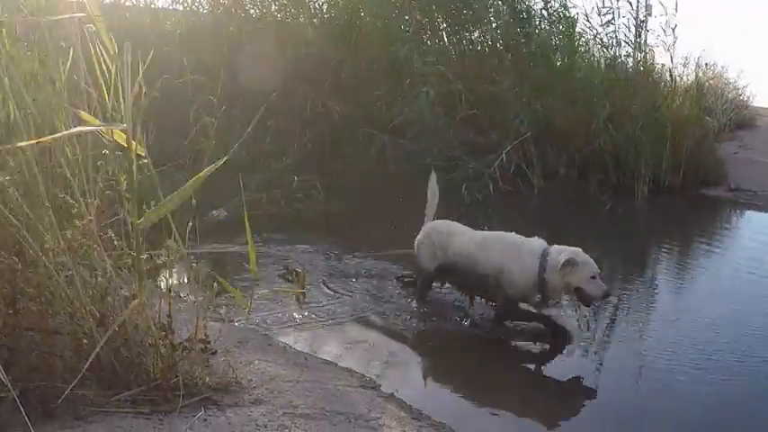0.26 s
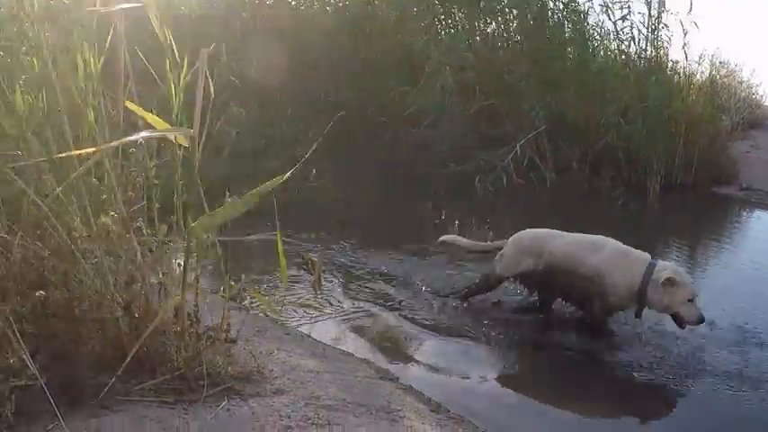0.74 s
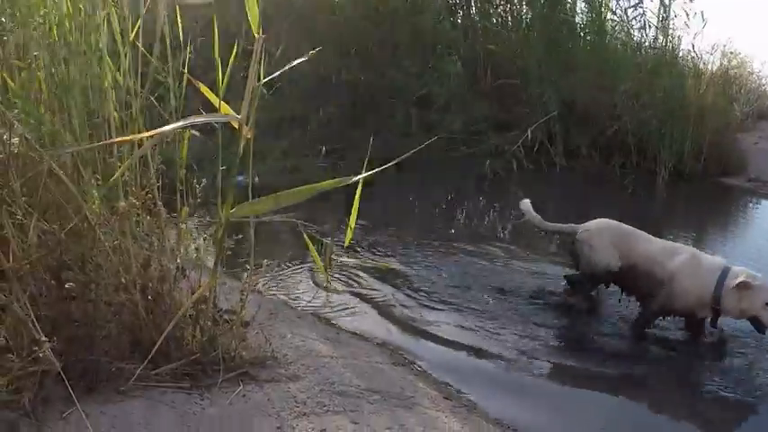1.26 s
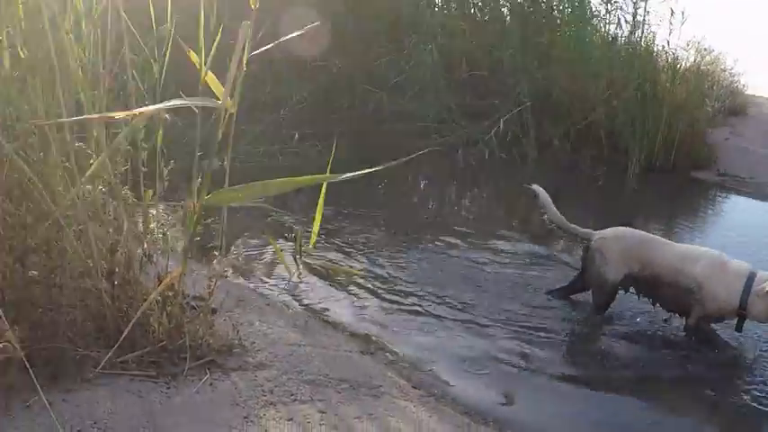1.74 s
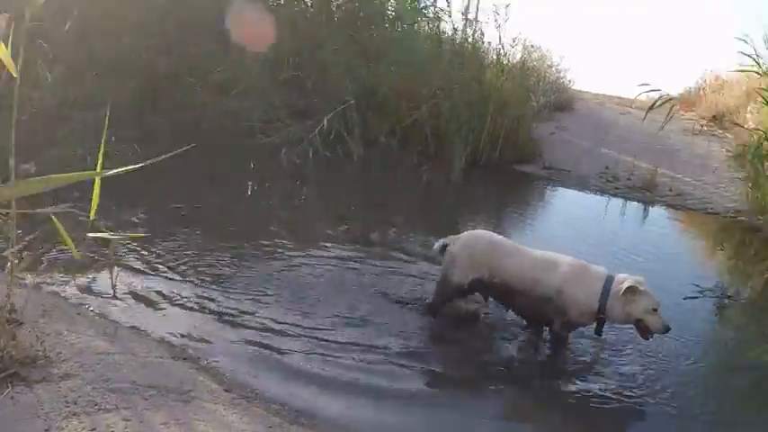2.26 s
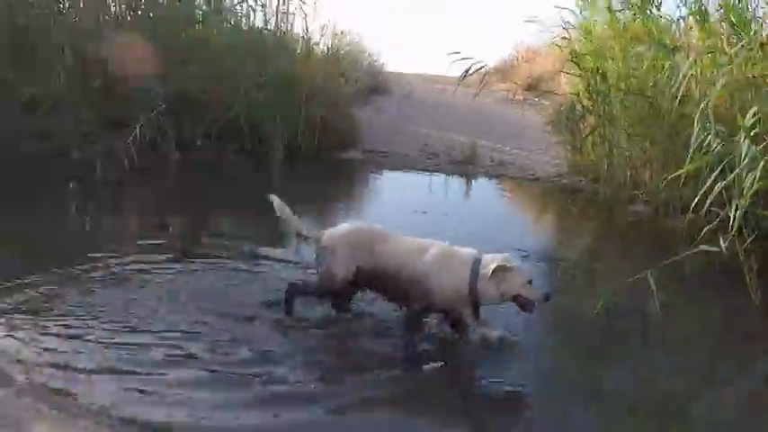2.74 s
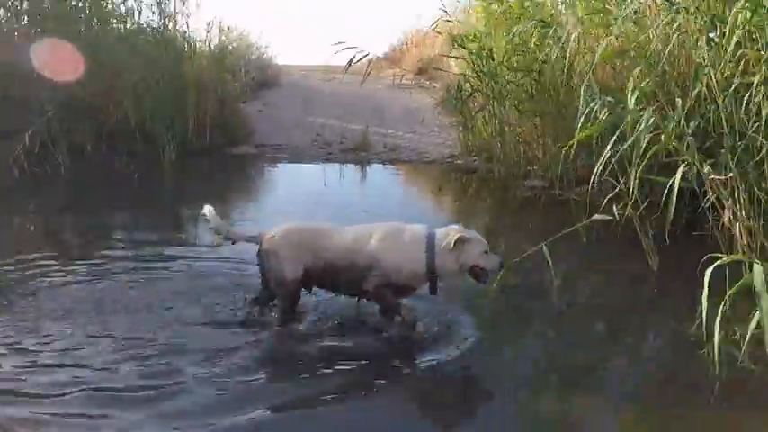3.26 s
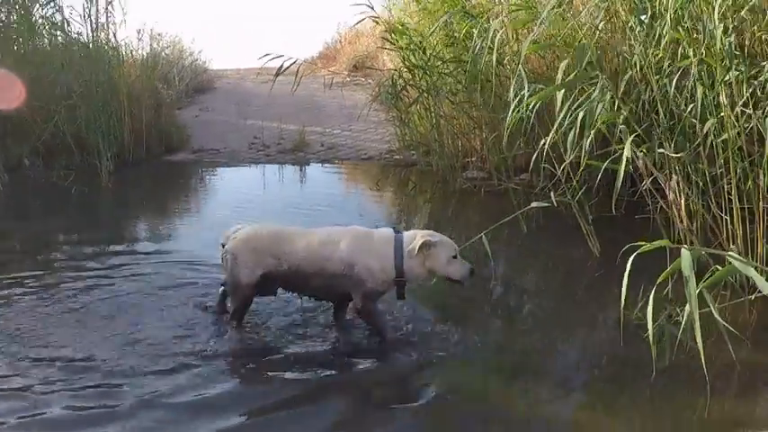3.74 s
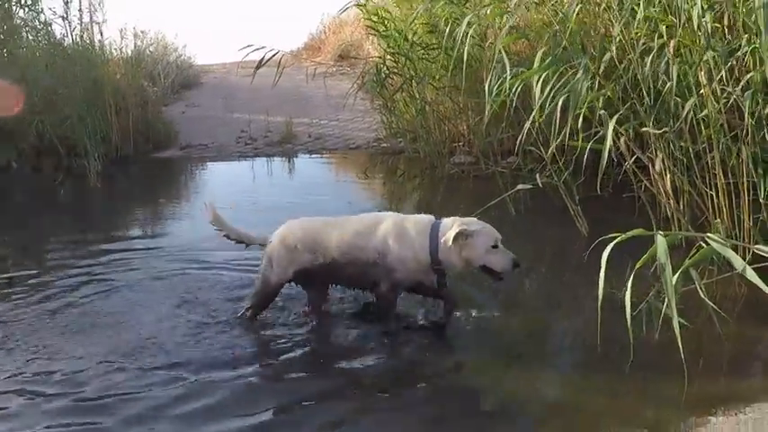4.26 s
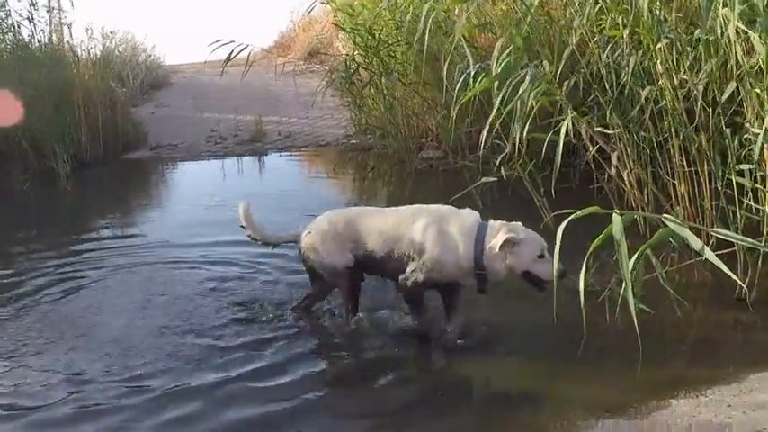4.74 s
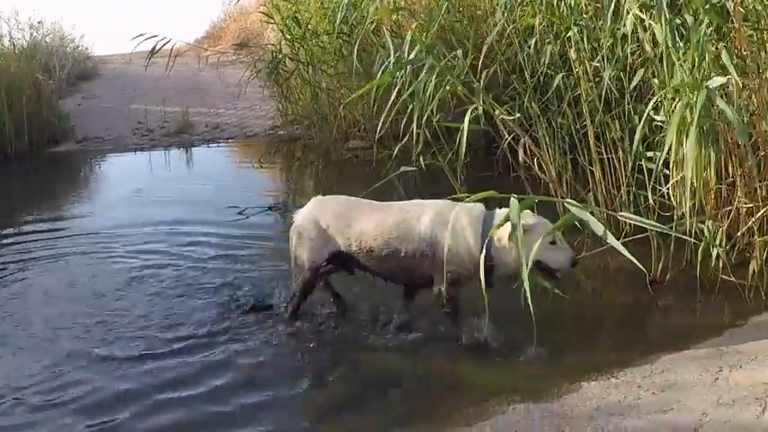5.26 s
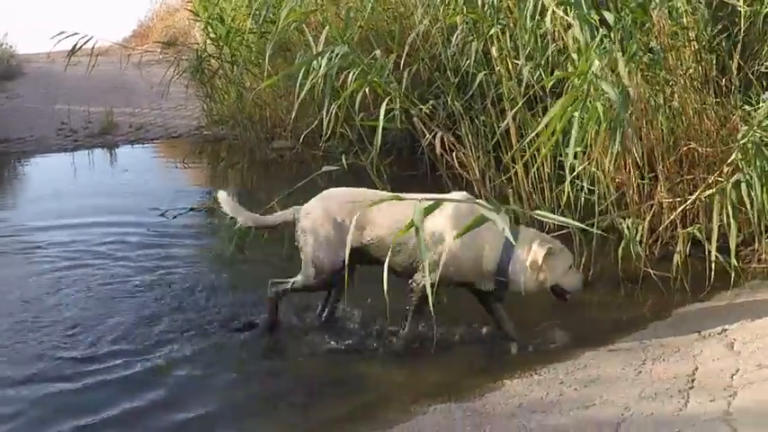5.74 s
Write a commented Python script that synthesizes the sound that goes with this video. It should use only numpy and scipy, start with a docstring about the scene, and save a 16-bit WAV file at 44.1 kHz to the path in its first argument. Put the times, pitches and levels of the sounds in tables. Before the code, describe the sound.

A dog walks through a shallow reed-fringed pool: hollow plops, wet slaps, small gurgles, fizzing spray and falling drops in quick uneven steps. Wind batters the handheld camera microphone at first, with thudding handling knocks around two seconds; then the rumble drops away and the splashing stands clear over a soft hiss of reeds.

```python
"""A dog wades through a shallow pool: paws plop and slap, legs churn up bubbles and spray, drops fall back.
Water is ringing air pockets (decaying, gliding sines), swarms of small bubbles and short noise bursts.
The hand-held camera knocks and jolts (damped sines); wind, mostly early, buffets its two microphone ports
(lumpy filtered noise). Reedy banks return a faint echo, and the reeds hiss all around (stereo noise)."""
import sys
import numpy as np
from scipy import signal
from scipy.fft import rfft, irfft, next_fast_len
from scipy.io import wavfile
from scipy.ndimage import map_coordinates

SR = 44100
rng = np.random.default_rng(int(sys.argv[2]) if len(sys.argv) > 2 else 0)


def transcribe(signal):
    """Save signal, clipped to [-1, 1], as a 16-bit WAV file at the path in sys.argv[1]."""
    frames = np.atleast_2d(signal).T
    limited = np.clip(frames, -1, 1)
    pcm = np.round(limited * 32767).astype(np.int16)
    wavfile.write(sys.argv[1], SR, pcm)


N = 264600


def amp(db):
    """Decibels to gain."""
    return 10 ** (np.asarray(db) / 20)


def unit(x):
    """Scale to rms 1."""
    return x / np.sqrt(np.mean(x ** 2) + 1e-20)


def along(points, hz):
    """Interpolate (f/Hz, value) points on a log frequency axis."""
    f, v = np.transpose(points)
    return np.interp(np.log(hz + 1), np.log(f + 1), v)


def curves(rows):
    """One value per sample for each column after the time."""
    s, *cols = np.transpose(rows)
    return [np.interp(np.arange(N) / SR, s, c) for c in cols]


def wobble(rate_per_s):
    """Smooth random curve through rate_per_s knots a second."""
    knots = rng.standard_normal(int(N * rate_per_s / SR) + 4)
    return map_coordinates(knots, [np.arange(N) * rate_per_s / SR])


def filtered(x, response):
    """Apply a complex response of frequency."""
    m = next_fast_len(N + SR // 4)
    return irfft(rfft(x, m) * response(np.fft.rfftfreq(m, 1 / SR)), m)[..., :N]


def coloured(x, spectrum):
    """Shape x by a spectrum, at rms 1."""
    return unit(filtered(x, lambda hz: amp(along(spectrum, hz))))


def add(track, s, sound):
    """Mix a sound into a track from time s on."""
    part = track[max(round(s * SR), 0):][:len(sound)]
    part += sound[:len(part)]


def bubble(t, hz, life, glide, onset):
    """An air pocket rings and dies at peak 1; pitch slides by glide octaves as its depth changes."""
    pitch = hz * 2 ** (glide * (np.tanh(t / life / 2) - .5))
    swell = np.exp(-t / life) * (1 - np.exp(-(t / life / onset) ** 2))
    swell = swell / swell.max(axis=-1, keepdims=True)
    return swell * np.sin(2 * np.pi * np.cumsum(pitch, axis=-1) / SR)


def froth(spectrum, rate, centre_hz, cycles, spread_db):
    """A swarm of small bubbles, rate a second, of scattered pitch and size, at rms 1."""
    draws = rng.random((int(rate * N / SR), 4))
    start, tone, age, size = draws.T[:, :, None]
    hz = centre_hz * 2 ** (2 * tone - 1)
    steps = np.arange(int(8 * cycles / centre_hz * SR))
    strength = amp(spread_db * np.minimum(-np.log(size + 1e-9), 4))
    rings = strength * bubble(steps / SR, hz, cycles * (.5 + age) / hz, glide=0.083, onset=0.035)
    places = (start * N).astype(int) + steps
    return coloured(np.bincount(places.ravel(), rings.ravel(), N)[:N], spectrum)


def foam(t, hz, octaves, life):
    """Countless tiny bubbles around one pitch: a noise burst starting near rms 1 and dying away."""
    bell = np.exp(-(np.log2((np.fft.rfftfreq(len(t), 1 / SR) + 1) / hz) / octaves) ** 2)
    shape = np.exp(-t / life) * (1 - np.exp(-t / 0.0005))
    burst = shape * irfft(rfft(rng.standard_normal(len(t))) * bell, len(t))
    return unit(burst) * np.sqrt(np.mean(shape ** 2))


# air pockets closing behind a paw: t/s, peak level/dB, f/Hz, nominal life/s (scaled in plops)
PLOPS = [(.015, -18.5, 590, 0.0022), (0.199, -26.5, 1110, 0.0043), (.399, -24.5, 556, 0.004),
         (0.498, -17, 560, 0.0023), (.498, -18.5, 918, 0.0067), (.884, -17.5, 512, 0.0051),
         (1.145, -23, 514, 0.0046), (1.145, -20.5, 1040, 0.0017), (1.347, -27.5, 714, 0.0051),
         (1.706, -35, 533, 0.0049), (1.884, -22.5, 587, 0.0077), (2.403, -28.5, 543, 0.0078),
         (2.435, -24.5, 590, 0.004), (2.473, -19, 1370, 0.0033), (2.496, -24.5, 565, 0.0046),
         (2.761, -25, 586, 0.0076), (2.773, -17, 504, 0.009), (2.849, -30, 535, 0.0079),
         (2.891, -30.5, 1060, 0.013), (2.94, -28.5, 580, 0.0037), (3.103, -16.5, 520, 0.0048),
         (4.077, -28, 970, 0.0038), (4.161, -23.5, 203, 0.0097), (4.163, -17.5, 1635, 0.0024),
         (4.551, -13, 900, 0.0039), (4.552, -21, 1520, 0.0038), (4.581, -30, 1570, 0.0057),
         (4.822, -22.5, 168, 0.012), (4.848, -28, 190, .011), (4.901, -21, 487, 0.0057),
         (4.901, -20.5, 278, 0.0068), (5.217, -21, 670, 0.006), (5.225, -22, 472, 0.0072),
         (4.946, -34, 1180, 0.0033), (5.082, -30, 1190, 0.01), (5.413, -24, 1014, 0.0073),
         (5.414, -23.5, 1157, 0.0098), (5.43, -34, 630, 0.0045), (5.448, -28.5, 1115, 0.0051),
         (5.539, -25.5, 420, 0.0099), (5.552, -24, 275, 0.0074), (5.554, -24, 557, 0.013),
         (5.557, -23.5, 956, 0.0043), (5.553, -25, 1530, 0.0029), (5.742, -29, 1140, 0.0045),
         (5.755, -43, 526, 0.0026), (5.882, -32, 1210, .005)]
PLOP_LIFE_SCALE, PLOP_LIFE_MIN_S = .75, .001
FOAM_DB, FOAM_OCTAVES, FOAM_LIFE_RATIO = -15.5, 0.74, 2.2  # level and life relative to the plop


def plops():
    """A plunging paw deepens its cavity: pitch sags; it foams, sheds smaller pockets, shoves the water."""
    out, t = np.zeros(N), np.arange(SR // 6) / SR
    for s, db, hz, nominal_life in PLOPS:
        life = max(nominal_life * PLOP_LIFE_SCALE, PLOP_LIFE_MIN_S)
        torn_walls = np.interp(t * 350, np.arange(64), rng.standard_normal(64))
        unsteady_hz = hz * 2 ** (0.091 * torn_walls)
        cavity = bubble(t, unsteady_hz, life, glide=-0.1, onset=min(.95, 0.0034 / life))
        add(out, s - .001, amp(db) * cavity)
        add(out, s, amp(db + FOAM_DB) * foam(t, hz * 0.79, FOAM_OCTAVES, FOAM_LIFE_RATIO * life))
        shove = bubble(t, hz * .5, life, glide=-0.034, onset=1.0)
        add(out, s, amp(db - 19.0) * shove)
        for delay, tone in rng.random((3, 2)):
            shed_hz = hz * 2 ** (0.23 + 0.72 * tone)
            shed = bubble(t, shed_hz, life * 0.47, glide=0.17, onset=0.32)
            add(out, s + 3 * life * delay, amp(db - 18.0) * shed)
    return out


TRAIL_MAX_S, TRAIL_DB, TRAIL_SPREAD_OCT = 0.081, -18, 0.454  # latest delay; earliest level re plop; +/- pitch


def trails():
    """A few bubbles surface after each plop, each rising in pitch, the later the weaker."""
    out, t = np.zeros(N), np.arange(SR // 10) / SR
    for s, db, hz, _ in PLOPS:
        for delay, tone in rng.random(size=(4, 2)):
            pitch = hz * 2 ** (TRAIL_SPREAD_OCT * (2 * tone - 1))
            ring = bubble(t, pitch, life=4.5 / pitch, glide=0.16, onset=0.16)
            add(out, s + TRAIL_MAX_S * delay, amp(db + TRAIL_DB - 10 * delay) * ring)
    return out


# air pockets dragged by a leg: t/s, level/dB, first f/Hz, last f/Hz, length/s
GLUGS = [(0.487, -26, 476, 690, 0.017), (.88, -28, 388, 926, 0.029), (2.777, -28.5, 500, 613, 0.041),
         (2.917, -34, 502, 607, 0.046), (3.107, -28, 520, 372, 0.021), (3.129, -24, 492, 674, 0.023),
         (3.186, -31, 385, 620, 0.041), (3.232, -31, 550, 395, 0.027), (3.308, -36, 625, 500, .05),
         (4.089, -36, 587, 660, 0.034), (4.749, -35.5, 727, 960, 0.039), (4.841, -29.5, 593, 471, 0.057),
         (5.14, -31, 490, 740, .04), (5.227, -27.5, 638, 368, 0.03), (5.494, -40, 597, 416, 0.078)]
GLUG_WAVER_OCT, GLUG_ROUGH = .1, .45  # unsteadiness of pitch; of level as a share


def glugs():
    """A dragged pocket sings on, sliding as it sinks or rises; its torn wall makes it gargle."""
    out, t = np.zeros(N), np.arange(SR // 8) / SR
    for s, db, start_hz, end_hz, length in GLUGS:
        age = np.minimum(t / length, 1)
        waver, gargle = [np.interp(t * 300, np.arange(64), knots) for knots in rng.standard_normal((2, 64))]
        pitch = start_hz * (end_hz / start_hz) ** age * 2 ** (GLUG_WAVER_OCT * waver)
        shape = (1 - np.exp(-t / 0.0025)) * np.sqrt(1 - age) * (1 + GLUG_ROUGH * gargle)
        add(out, s, amp(db) * shape * np.sin(2 * np.pi * np.cumsum(pitch) / SR))
    return out


# water thrown up by a step: t/s, nominal slap level/dB, nominal spray level/dB, nominal length/s
SPLASHES = [(0.016, -34.5, -44, 0.013), (0.194, -35, -46, 0.0083), (0.348, -39, -41, 0.0066),
            (0.397, -37, -39, 0.0076), (0.493, -31, -46, 0.0089), (0.506, -32, -32, 0.0086),
            (0.521, -29, -35, 0.0092), (0.684, -27, -39, 0.0088), (0.722, -34, -40, 0.0057),
            (0.754, -33, -50, 0.0091), (0.886, -33.5, -40, 0.014), (1.125, -36, -31.5, 0.0045),
            (1.147, -34, -39, 0.0054), (1.169, -35, -45, 0.01), (1.515, -27.5, -30.5, 0.0055),
            (1.706, -39, -43, 0.0093), (1.775, -33.5, -53, 0.011), (1.802, -37, -42, 0.016),
            (1.886, -28, -41, 0.011), (1.899, -28, -28.5, 0.0073), (2.152, -56, -39, 0.0057),
            (2.467, -44, -38, 0.0066), (2.472, -37, -32, 0.0051), (2.51, -51, -41, 0.011),
            (2.592, -52, -38.5, 0.008), (2.625, -53, -35.5, 0.006), (2.724, -32, -37, 0.014),
            (2.847, -52, -34.5, 0.0036), (2.978, -33.5, -40, 0.0068), (3.11, -34, -33.5, 0.0049),
            (3.144, -30, -31.5, 0.0035), (3.183, -34, -44, 0.0094), (3.269, -47, -43, 0.015),
            (3.422, -50, -39, 0.0054), (3.553, -40, -42.5, 0.02), (4.16, -36, -31.5, 0.0035),
            (4.177, -46, -35, 0.0074), (4.552, -40, -40, 0.0043), (4.563, -48, -40, 0.009),
            (4.753, -42, -39, 0.012), (4.79, -47, -36, 0.0029), (4.815, -35, -43, 0.0091),
            (4.84, -35, -52, 0.017), (4.902, -30.5, -35.5, 0.01), (5.052, -53, -34, 0.0035),
            (5.079, -42, -33, 0.003), (5.223, -37.5, -38.5, 0.03), (5.346, -46, -40.5, 0.014),
            (5.379, -38, -37, 0.004), (5.424, -35, -41.5, 0.031), (5.483, -38, -38, 0.0048),
            (5.549, -32, -33.5, 0.008), (5.689, -31.5, -41, 0.0046), (5.816, -42, -41.5, 0.025)]
# spectrum of middle-sized bubbles: f/Hz, relative density/dB
SLOSH = [(400, -52), (950, 0.5), (1700, 5.5), (2400, 7), (4000, -28), (9000, -55)]
# spectrum of flung spray: f/Hz, relative density/dB
SPRAY = [(1200, -14), (2400, -6.5), (3200, 1.5), (3800, 2), (4500, 2), (5600, 2), (7500, -1), (10500, -3),
         (12500, -20), (15000, -38)]
SLAP_GAIN_DB, SPRAY_GAIN_DB = -0.5, 5.5  # added to the nominal levels
RAGGED_DB, RAGGED_PER_S = 0.5, 260  # the thrown sheet tears into lumps
LEAD_IN_S, LEAD_IN_DB = 0.0035, -7.5  # soft swell into each splash


def splashes():
    """Each splash swells quickly, bursts into a ragged cloud of bubbles and spray, and dies in a weaker tail."""
    slap = froth(SLOSH, rate=1500, centre_hz=1472, cycles=3.2, spread_db=-1.5)
    spray = froth(SPRAY, rate=1700, centre_hz=3860, cycles=3.8, spread_db=1.5)
    lumps = amp(RAGGED_DB * wobble(RAGGED_PER_S))
    out, steps = np.zeros(N), np.arange(-SR // 20, SR // 4)
    t = steps / SR
    after = np.maximum(t, 0)
    for s, slap_db, spray_db, length in SPLASHES:
        burst = np.exp(-(after / max(length * 1.25, .003)) ** 4)
        tail = amp(-3.5) * (1 - burst) * np.exp(-after / 0.0098)
        shape = (1 - np.exp(-(after / 0.0042) ** 2)) * (burst + tail)
        shape = shape + amp(LEAD_IN_DB) * np.exp(-np.abs(t) / LEAD_IN_S)
        for db, swarm in (slap_db + SLAP_GAIN_DB, slap), (spray_db + SPRAY_GAIN_DB, spray):
            cloud = shape * (lumps * swarm).take(round(s * SR) + steps, mode="wrap")
            cloud = amp(db) * unit(cloud) * np.sqrt(np.mean(shape ** 2))
            add(out, s - .001 + t[0], cloud[s - .001 + t >= 0])  # drop what precedes t = 0
    return out


# flat smacks of a paw or a lump of water: t/s, nominal level/dB, middle f/Hz, life/s
SMACKS = [(.315, -20, 4200, .002), (.513, -23, 3200, .005), (.531, -24.5, 2200, 0.0089),
          (1.145, -27, 990, .003), (1.348, -27, 885, 0.0024), (1.517, -19, 2280, 0.0034),
          (1.81, -28, 3580, .005), (2.490, -18, 4300, .003), (2.626, -23, 4770, 0.0035),
          (3.323, -26.5, 2600, .004), (3.560, -22, 3400, 0.0023), (4.077, -24.5, 1510, .003),
          (4.163, -17, 1960, .0035), (4.285, -27, 1900, 0.004), (4.902, -26, 1900, 0.0056),
          (5.083, -19.5, 4500, 0.0034), (5.219, -28, 1040, 0.015), (5.431, -27, 1900, .003),
          (5.554, -20.5, 3800, 0.0055), (5.567, -23, 3600, .003)]
SMACK_GAIN_DB, SMACK_OCTAVES = -1.5, 0.49


def smacks():
    """Water struck flat cracks at once and hardly rings."""
    out, t = np.zeros(N), np.arange(SR // 10) / SR
    for s, db, hz, life in SMACKS:
        add(out, s, amp(db + SMACK_GAIN_DB) * foam(t, hz, octaves=SMACK_OCTAVES, life=life))
    return out


SPIT_DB, SPIT_HZ, SPIT_RANGE_OCT = 1, 2320, 2.62  # mean level re nominal splash; middle pitch; full range


def spits():
    """Lumps of the torn sheet smack the surface one by one: a few sharp ticks about each splash."""
    out, t = np.zeros(N), np.arange(SR // 100) / SR
    for s, slap_db, spray_db, length in SPLASHES:
        for wait, tone, size in rng.random(size=(4, 3)):
            pitch = SPIT_HZ * 2 ** (SPIT_RANGE_OCT * (tone - .5))
            db = slap_db + (spray_db - slap_db) * tone + SPIT_DB + 6 * (size - .5)
            tick = bubble(t, pitch, life=2.4 / pitch, glide=0.13, onset=0.17)
            add(out, s + 0.001985 + 1.5 * length * wait ** 2, amp(db) * tick)
    return out


TRICKLE_MAX_S, TRICKLE_HZ = .16, 2940  # latest delay; middle pitch
TRICKLE_DB, TRICKLE_FADE_DB = 0.5, -10.5  # first mean level re nominal splash; change by the last


def trickle():
    """Thrown water lands again as ticking droplets, ever sparser and on average weaker."""
    out, t = np.zeros(N), np.arange(SR // 80) / SR
    for s, slap_db, spray_db, length in SPLASHES:
        for wait, tone, size in rng.random(size=(14, 3)):
            pitch = TRICKLE_HZ * 2 ** (1.93 * (tone - .5))
            db = (slap_db + spray_db) / 2 + TRICKLE_DB + TRICKLE_FADE_DB * wait + 8 * (size - .5)
            tick = bubble(t, pitch, life=3.2 / pitch, glide=0.26, onset=0.49)
            add(out, s + length + TRICKLE_MAX_S * wait ** 1.3, amp(db) * tick)
    return out


# single drops falling back: t/s, nominal peak level/dB, f/Hz
DRIPS = [(.093, -31, 4180), (.139, -31, 1070), (.574, -30.5, 1850), (.624, -31, 4300), (0.733, -26, 3180),
         (1.708, -29.5, 1540), (1.814, -31, 4400), (2.474, -19, 4440), (2.519, -34, 3140),
         (2.668, -32, 2270), (3.110, -27.5, 1960), (3.322, -25, 2620), (4.811, -35, 1170),
         (4.820, -29, 1610), (5.058, -30, 4100), (5.135, -28.5, 4180), (5.248, -27.5, 3210),
         (5.351, -29, 3120), (5.361, -30, 3130), (5.382, -26.5, 3750), (5.514, -34, 1590)]
DRIP_GAIN_DB = 1.5


def drips():
    """Each drop ticks on the surface, breaks up and traps a few tiny bubbles."""
    out, t = np.zeros(N), np.arange(SR // 20) / SR
    for s, db, hz in DRIPS:
        add(out, s, amp(db + DRIP_GAIN_DB) * bubble(t, hz, life=0.0036, glide=0.17, onset=0.29))
        for delay, tone in rng.random((6, 2)):
            tiny_hz = hz * 2 ** (0.64 * (tone - .5))
            tiny = bubble(t, tiny_hz, life=0.00055, glide=0.052, onset=0.36)
            add(out, s + 0.014 * delay ** 2, amp(db - 6.0 - 3.8 * delay) * tiny)
    return out


# a leg sweeping through water: t/s at its fastest, nominal level/dB, length/s,
# depth/dB (more gurgle, less fizz)
SWEEPS = [(.11, -42.5, 0.09, -9), (.35, -35, 0.11, -4), (.55, -38.5, 0.089, 0), (.8, -45.5, 0.29, 9),
          (1.12, -42.5, 0.24, 4), (1.41, -36.5, 0.089, 2), (1.73, -46.5, 0.15, 12), (1.98, -41.5, 0.069, 2),
          (2.48, -39, 0.12, 6.5), (2.71, -37.5, 0.14, 7.5), (2.92, -45.5, 0.1, 7), (3.19, -41, 0.37, 5.5),
          (3.4, -43.5, 0.13, 0), (3.58, -43, 0.12, 3), (4.12, -41, 0.12, 7), (4.21, -42, 0.093, -12),
          (4.385, -36.5, 0.067, -2), (4.47, -35.5, 0.026, 2), (4.6, -38.5, 0.054, 5.5),
          (4.82, -37.5, 0.076, -3), (5.06, -42, 0.14, -25), (5.39, -44, 0.049, -25), (5.49, -39, 0.06, 1),
          (5.66, -35, 0.048, -6), (5.75, -40, 0.024, 9), (5.87, -44.5, 0.046, 11)]
SWEEP_RISE, SWEEP_FALL = 0.54, 1.07  # shares of a sweep's length
SETTLE_S, SETTLE_DB = 1, -10.5  # stirred water laps on after each sweep
GURGLE_DB, FIZZ_DB, FIZZ_PER_DEPTH = -8, -1, -0.15  # re sweep level, before wash gains; dB per dB of depth


def churn():
    """Each sweep swells, falls away and leaves water lapping: gurgle, slosh, fizz levels in dB."""
    now, power = np.arange(0, N, 64) / SR, 0
    for s, db, length, depth_db in SWEEPS:
        before, after = np.maximum(s - now, 0), np.maximum(now - s, 0)
        rise = np.exp(-(before / (SWEEP_RISE * length)) ** 2 / 2)
        fall = np.exp(-(after / (SWEEP_FALL * length)) ** 2)
        lapping = amp(SETTLE_DB) * np.exp(-after / SETTLE_S)
        shape = rise * np.hypot(fall, lapping)
        sizes = amp(db + np.array([GURGLE_DB + depth_db, 0, FIZZ_DB + FIZZ_PER_DEPTH * depth_db]))
        power = power + np.outer(shape, sizes) ** 2
    return curves(np.column_stack([now, 10 * np.log10(power + 1e-12)]))


# spectrum of large bubbles: f/Hz, relative density/dB
GURGLE = [(200, 2), (380, -13), (540, 0), (750, -4), (1100, -5), (2500, -57)]
# spectrum of small bubbles: f/Hz, relative density/dB
FIZZ = [(1200, 1), (2400, -9), (3200, -2), (3800, 0), (4500, 1.5), (5600, 0.5), (7500, -0.5), (10500, -30),
        (12500, -18), (15000, -36)]
CLUMP_DB, CLUMP_PER_S = 1.77, 55  # churned water breaks in uneven spurts
PATTER_DB = -11.5  # drops flung off the legs, re slosh level from churn


def wash():
    """Dragging legs keep bubbles of three sizes coming in spurts, with a patter of stray drops."""
    gurgle_db, slosh_db, fizz_db = np.array(churn()) + CLUMP_DB * wobble(CLUMP_PER_S)
    gurgle = amp(gurgle_db - 0.5) * froth(GURGLE, rate=700, centre_hz=664.0, cycles=3.8, spread_db=4.5)
    slosh = amp(slosh_db - 5) * froth(SLOSH, rate=1400, centre_hz=1563, cycles=8.4, spread_db=3.5)
    fizz = amp(fizz_db) * froth(FIZZ, rate=1300, centre_hz=4190, cycles=6.3, spread_db=2.5)
    patter_swarm = froth(SPRAY, rate=130, centre_hz=3200, cycles=2.2, spread_db=3.5)
    return gurgle + slosh + fizz + amp(slosh_db + PATTER_DB) * patter_swarm


# hard knocks through the camera body: t/s, sideways shake level/dB, lurch level/dB
KNOCKS = [(1.156, -8, -13.5), (1.216, -15, -20), (1.73, -2.5, -16), (1.769, -10, -12), (1.79, -6, -19),
          (1.839, -4, -18), (1.889, -6, -15), (1.938, -4.5, -16), (1.959, -7.5, -15), (2.003, -9, -15.5),
          (2.159, -6, -12.5), (2.177, -5, -19), (2.273, -11, -12), (2.398, -12, -20), (2.465, -9, -21),
          (2.498, -8, -18), (2.539, -11, -18), (3.226, -22, -29), (3.323, -25, -43), (3.66, -20, -31),
          (3.815, -21, -35), (4.719, -15, -44), (4.768, -19, -44), (5.356, -22, -42), (5.63, -22, -46),
          (5.831, -30, -48)]
KNOCK_HZ, KNOCK_SPREAD_OCT = 138.6, 0.15  # body ring and its scatter
GRIP_DB, GRIP_SPREAD_DB, GRIP_LURCH_DB = -26, 5, -60  # faint knocks of the shifting grip


def handling():
    """Turning to follow, the camera knocks: shake is opposite at the two ports, lurch alike."""
    shake, lurch, t = np.zeros(N), np.zeros(N), np.arange(SR // 8) / SR
    grip = [(when * N / SR, GRIP_DB + GRIP_SPREAD_DB * (2 * force - 1), GRIP_LURCH_DB)
            for when, force in rng.random(size=(30, 2))]
    for s, shake_db, lurch_db in grip + list(KNOCKS):
        hz = KNOCK_HZ * 2 ** (KNOCK_SPREAD_OCT * rng.standard_normal())
        add(shake, s - .002, amp(shake_db) * bubble(t, hz, life=0.0052, glide=-0.32, onset=0.53))
        add(lurch, s - .002, amp(lurch_db) * bubble(t, hz * 0.43, life=0.0065, glide=-0.6, onset=0.83))
        housing_tap = bubble(t, hz * 2.34, life=0.0022, glide=-0.29, onset=0.33)
        add(lurch, s, amp(shake_db - 21.5) * housing_tap)
    return np.array([lurch + shake, lurch - shake])


# the hand jolts the whole camera: t/s, peak level/dB, f/Hz
JOLTS = [(.17, -25, 36), (.87, -22, 42), (1.775, -20, 44), (1.885, -19, 35), (2.159, -19, 40.5),
         (5.43, -39, 36)]
JOLT_LIFE_S = 0.028


def jolts():
    """A jolt swings both ports together through the air: one or two deep heaves."""
    out, t = np.zeros(N), np.arange(SR // 4) / SR
    for s, db, hz in JOLTS:
        add(out, s, amp(db) * bubble(t, hz, life=JOLT_LIFE_S, glide=-.3, onset=0.56))
    return out


# steady wind: t/s, nominal strength/dB
STEADY_WIND = [(0.0, -27), (0.53, -25), (1.03, -28.5), (1.42, -27), (1.6, -32), (2.31, -35.5), (2.72, -37),
               (3.11, -38.5), (4.55, -56), (5.06, -44.5), (6.0, -42)]
# gusts: t/s at the peak, nominal rumble/dB, nominal flutter/dB, 1/e half length/s, left-right/dB
GUSTS = [(0.062, -16.5, -22, 0.035, 2), (0.136, -20, -24, 0.037, -13), (0.244, -18, -23, 0.038, -1.5),
         (0.348, -20, -29.5, 0.08, -5.5), (0.472, -23.5, -30.5, 0.065, -10),
         (0.646, -19.5, -18.5, 0.028, 13.5), (0.703, -19.5, -26.5, 0.018, 16), (0.867, -14, -18, 0.013, 12),
         (1.112, -28.5, -31, 0.036, 2), (1.261, -19, -38.5, 0.041, 0), (1.391, -20, -25, 0.027, 20),
         (1.44, -16, -24.5, 0.028, 11), (1.585, -20, -36.5, 0.05, 4.5), (1.786, -16, -32, 0.011, -14),
         (1.918, -22, -34, 0.031, -23), (2.065, -24.5, -51, 0.0096, -5), (2.179, -23.5, -38, 0.039, -13),
         (2.28, -20, -47, 0.011, -11), (2.318, -26, -53, 0.012, -11), (2.426, -26, -50, 0.023, -11),
         (2.484, -23.5, -41, 0.023, -7), (3.765, -41, -46, 0.17, -8), (5.836, -42, -37.5, 0.034, 9)]
WIND_DB, WIND_FLUTTER_DB, WIND_LEAN_DB = 2, -16, -4  # steady: gain; flutter re rumble; left-right
BUFFET_DB, BUFFET_PER_S = 1.5, 20  # the steady wind arrives in lumps
RUSTLE_DB = -57.5  # constant low rustle of the hand on the camera, before flutter gain


def airflow():
    """Bell-shaped gusts, each with its own lean, ride on steady wind: rumble, flutter, lean in dB."""
    now = np.arange(0, N, 64) / SR
    buffet_db = BUFFET_DB * np.interp(now * SR, np.arange(N), wobble(BUFFET_PER_S))
    steady_db = np.interp(now, *np.transpose(STEADY_WIND)) + WIND_DB
    rumble = amp(steady_db + buffet_db) ** 2  # powers from here on
    flutter = rumble * amp(WIND_FLUTTER_DB) ** 2 + amp(RUSTLE_DB) ** 2
    lean = WIND_LEAN_DB * (rumble + flutter)  # weighted by power
    for s, rumble_db, flutter_db, length, lean_db in GUSTS:
        bell = np.exp(-((now - s) / length) ** 2)
        low, high = np.outer(amp([rumble_db, flutter_db]) ** 2, bell)
        rumble, flutter, lean = rumble + low, flutter + high, lean + lean_db * (low + high)
    lean_db = lean / (rumble + flutter)
    return curves(np.column_stack([now, 10 * np.log10(rumble), 10 * np.log10(flutter), lean_db]))


def eddies(spectrum):
    """Lumpy pressure noise, different at each port."""
    lumps = amp(1.2 * np.array([wobble(30), wobble(30)]))
    return coloured(lumps * rng.standard_normal((2, N)), spectrum)


# brisk gusts, low part: f/Hz, relative density/dB
RUMBLE = [(12, -8), (30, -9.5), (60, -5.5), (100, -5), (150, -14), (300, -42), (900, -85)]
# light air: f/Hz, relative density/dB
SWAY = [(10, -14), (28, -5), (55, -5), (90, -10), (150, -23), (400, -77)]
# brisk gusts, upper part, and hand rustle: f/Hz, relative density/dB
FLUTTER = [(60, -49), (100, -3), (145, 4.5), (190, 0.5), (260, -8), (400, -26.5), (800, -80), (2500, -82)]
# hardest gusts: f/Hz, relative density/dB
TEARING = [(150, -48), (280, 9), (380, 0.5), (520, -8), (1000, -25), (3000, -70)]


def wind():
    """Light air mostly sways the ports; brisk gusts rumble higher and flutter, the hardest tear."""
    rumble_db, flutter_db, lean_db = airflow()
    brisk = np.clip((rumble_db + 39.0) / 20, 0, 1)
    low = np.sqrt(brisk) * eddies(RUMBLE) + np.sqrt(1 - brisk) * eddies(SWAY)
    rumble = amp(rumble_db + 2.5) * low
    flutter = amp(flutter_db + 4.5) * eddies(FLUTTER)
    tearing = amp(2 * flutter_db + 14.0) * eddies(TEARING)  # grows with the square of the flutter
    lean = amp(np.array([lean_db, -lean_db]) / 2)
    pressure = (rumble + flutter + tearing) * lean / np.sqrt(np.mean(lean ** 2, axis=0))
    return .8 * np.tanh(pressure / .8)  # softly rounds off the hardest gusts


# echo off the reedy banks: f/Hz, t60/s
BANKS = [(200, 0.025), (1500, 0.11), (9000, 0.11)]


def banks(x):
    """A scattered echo: decaying noise, different at each port, 300 samples late."""
    hz, t, z = signal.stft(rng.standard_normal((2, SR // 3)), SR, nperseg=256)
    decay = amp(-60 * t / along(BANKS, hz)[:, None])
    tail = signal.istft(z * decay, SR, nperseg=256)[1]
    late = np.pad(x, (300, 0))[None]
    return signal.fftconvolve(late, tail / np.linalg.norm(tail[0]), axes=1)[:, :N]


# likeness of the diffuse sound at the two ports: f/Hz, correlation
ALIKE = [(150, 0.24), (500, 0.32), (2000, 0.031), (4100, 0.68), (4700, 0.34), (5200, 0.23), (9000, 0.31),
         (13000, 0.21)]


def diffuse(spectrum):
    """Stereo noise of rms 1, partly alike at the two ports."""
    def mid_side(hz):
        turn = np.arccos(np.clip(along(ALIKE, hz), -1, 1)) / 2
        return amp(along(spectrum, hz)) * [np.cos(turn), np.sin(turn)]

    mid, side = filtered(rng.standard_normal((2, N)), mid_side)
    return unit(np.array([mid + side, mid - side]))


# breeze in the reed beds: t/s, hiss level/dB
BREEZE = [(0, -36), (.6, -33), (1.5, -35), (2.3, -35), (3.8, -37), (4.7, -37), (6, -38)]
# reed hiss: f/Hz, relative density/dB
REEDS = [(60, -38), (160, 10), (330, -3), (600, 1.5), (1200, -1.5), (2200, -5), (4500, -3.5), (5300, -3),
         (6300, -1.8), (7800, -9.5), (9600, -14.5), (11200, -28), (12200, -21.5), (14000, -26),
         (15000, -42)]


def reeds():
    """The reed beds hiss all around, following the breeze."""
    return amp(curves(BREEZE)[0]) * diffuse(REEDS)


def scene():
    """The dog ahead, the reeds around, wind and handling at the camera."""
    steps = plops() + trails() + glugs() + splashes() + smacks() + spits() + trickle() + drips()
    wake = wash()
    echo = banks(amp(-13.0) * steps + amp(-9.0) * wake)
    return steps + wake + echo + reeds() + wind() + handling() + jolts()


# level difference of the ports: f/Hz, left-right/dB
TILT = [(200, 1.5), (500, 0), (1200, -2), (3000, -2.5), (5200, 2), (6500, -5), (8300, -6.5), (10500, -3),
        (14000, 1)]
# phase difference of the ports: f/Hz, left lead/rad
LEAD = [(200, 0.13), (3000, 0), (4100, -0.04), (4700, -.42), (5050, -2), (5700, -1.5), (8000, -2),
        (10500, -1.5), (11800, 1)]
LOW_HZ, TOP_HZ = 8, 14900


def record(dry):
    """The housing shifts level and phase between ports; soft low cut, sharp top cut."""
    sides = np.array([[.5], [-.5]])
    ports = filtered(dry, lambda hz: amp(sides * along(TILT, hz)) * np.exp(1j * sides * along(LEAD, hz)))
    return filtered(ports, lambda hz: (hz < TOP_HZ) * hz ** 2 / (hz ** 2 + LOW_HZ ** 2))


dry = scene()
out = record(dry)
transcribe(out)
```